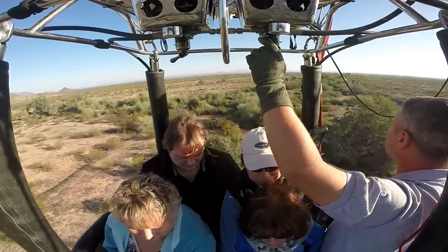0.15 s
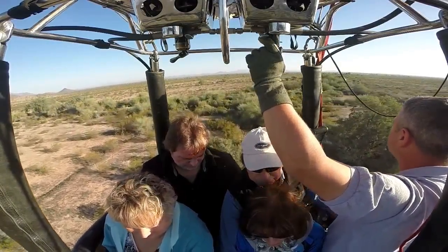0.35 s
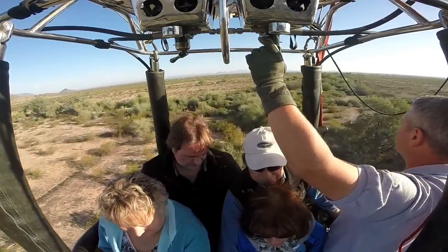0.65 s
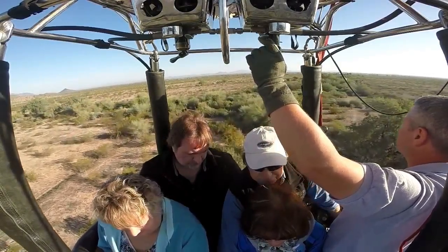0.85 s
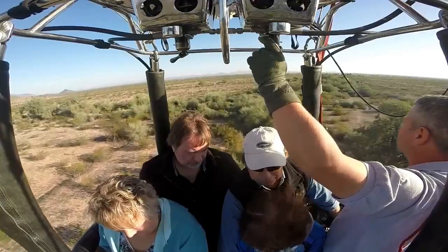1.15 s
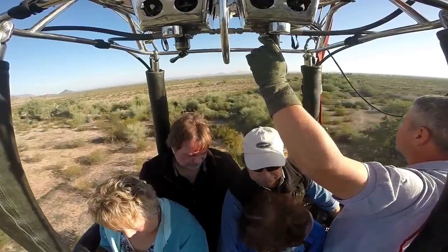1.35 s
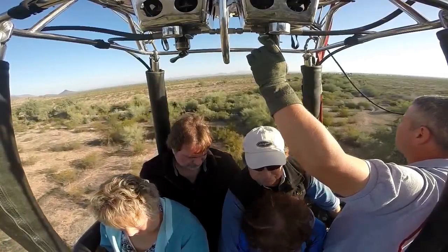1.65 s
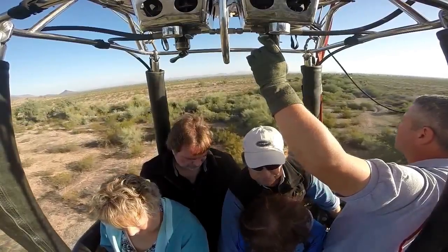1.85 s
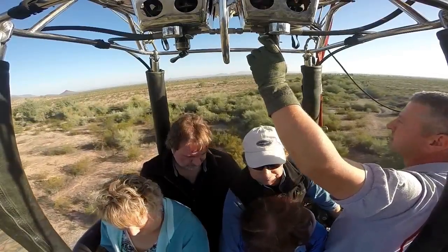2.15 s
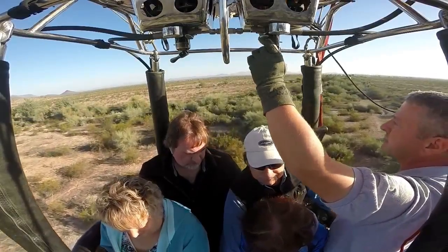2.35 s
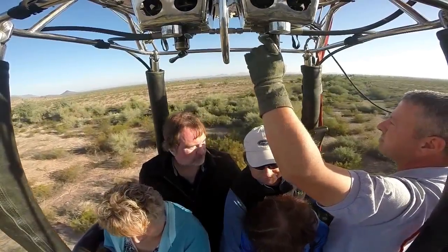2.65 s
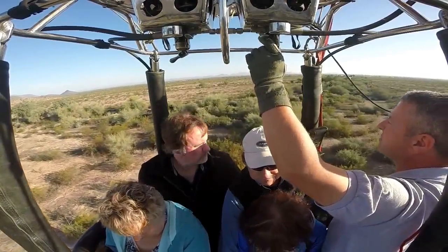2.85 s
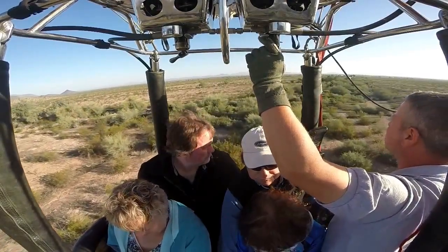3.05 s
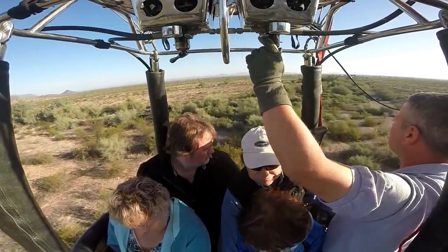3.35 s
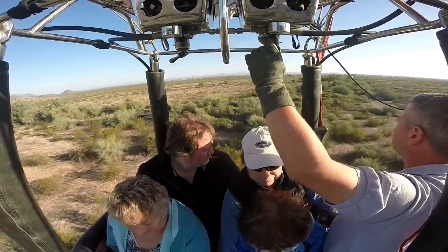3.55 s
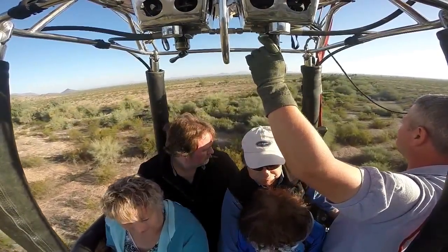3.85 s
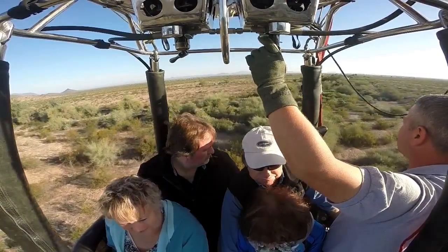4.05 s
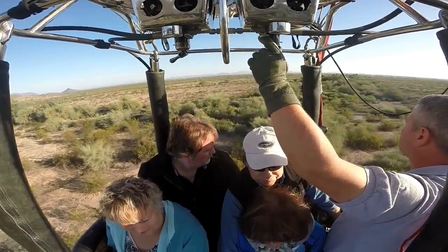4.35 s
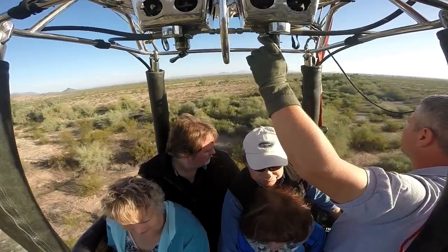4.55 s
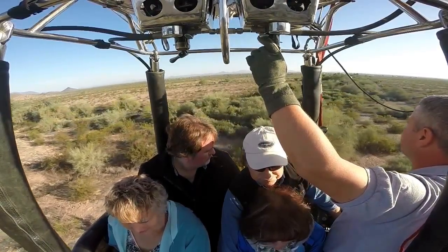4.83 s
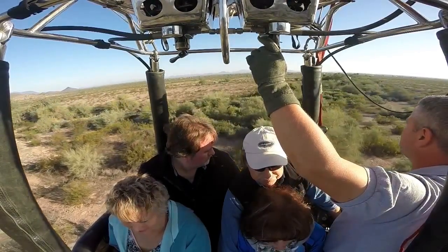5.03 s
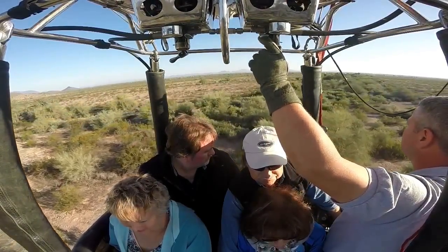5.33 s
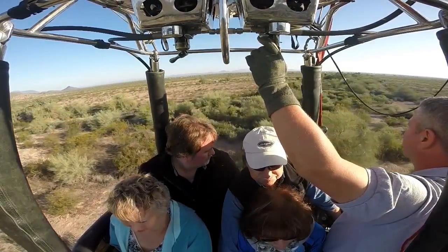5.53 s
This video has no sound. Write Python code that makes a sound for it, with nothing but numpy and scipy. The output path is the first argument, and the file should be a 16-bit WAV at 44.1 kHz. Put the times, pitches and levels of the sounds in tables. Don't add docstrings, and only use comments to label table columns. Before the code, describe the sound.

Close overhead in an open-air balloon basket, a propane burner fires six times in under six seconds. A tiny spit of gas, a deep whump, then a dense mid-low roar with hiss, about half a second to three quarters long. Each blast loses its treble and chokes off, leaving short gaps of softly fluttering pilot flames. The last blast is still burning at the end. Dry, slightly muffled small-camera sound.

```python
import sys
import numpy as np
from scipy import signal
from scipy.fft import rfft, irfft, next_fast_len
from scipy.io import wavfile
from scipy.ndimage import uniform_filter1d, map_coordinates

SR = 44100
rng = np.random.default_rng(int(sys.argv[2]) if len(sys.argv) > 2 else 0)


def bounce(signal):
    frames = np.transpose(np.atleast_2d(signal))
    limited = np.clip(frames, -1, 1)
    pcm = np.round(limited * 32767).astype(np.int16)
    wavfile.write(sys.argv[1], SR, pcm)


def ratio(d):
    e = np.asarray(d, float) / 20
    return 10 ** e


N = 250929

# time in seconds, peak of the push (1 = full scale),
# half width in seconds, share that rebounds, peak of the slow heave (1 = full scale).
IGNITIONS = [
    (0.387, 1.15, 0.00225, 0.11, 0.14),
    (1.228, 0.61, 0.0019, 0.0086, 0.2),
    (2.4964, 0.84, 0.0025, 0.2, 0.11),
    (3.4733, 0.53, 0.0018, -0.12, 0.31),
    (4.379, 0.31, 0.0015, 0.065, .08),
    (5.385, 0.16, 0.0029, .1, 0.11),
]


def unit(x):
    return x / np.sqrt(np.mean(x ** 2) + 1e-20)


def curves(rows):
    s, *cols = np.transpose(rows)
    return [np.interp(np.arange(N) / SR, s, c) for c in cols]


def wobble(rate):
    knots = rng.standard_normal(int(N * rate / SR) + 4)
    return map_coordinates(knots, [np.arange(N) * rate / SR])


def filtered(x, response):
    m = next_fast_len(N + 8192)
    return irfft(rfft(x, m) * response(np.fft.rfftfreq(m, 1 / SR)), m)[:N]


def turbulence(spectrum, patchy_db, flicker):
    z = signal.stft(rng.standard_normal(N), nperseg=512)[2]
    field = uniform_filter1d(rng.standard_normal(z.shape), size=5, axis=0)
    field = uniform_filter1d(field, size=8, axis=1)
    noise = signal.istft(z * ratio(patchy_db * unit(field)), nperseg=512)[1][:N]
    f, db = np.transpose(spectrum)
    colour = lambda hz: ratio(np.interp(np.log(hz + 1), np.log(f + 1), db, -120, -120))
    return unit(filtered(noise * ratio(flicker), colour))


def pilots():
    # frequency in Hz, level in dB per Hz.
    flutter_tone = [(12, -34), (24, 2.5), (102, -1), (351, -6.5), (649, -8), (722, -11), (848, -8.5),
                    (1300, -18), (1660, -30), (2540, -35.5), (3060, -36), (4000, -40), (5380, -43.5),
                    (10200, -58), (12500, -66), (15600, -76), (22000, -120)]
    # time in seconds, flutter level in dB, whistle level in dB.
    pilot_levels = [(0, -35.5, -60), (.3, -37.5, -59.5), (1.1, -41, -70), (2.2, -40, -77),
                    (2.3, -39.5, -74), (2.43, -36.5, -73), (3.4, -42, -71), (5.3, -37.5, -69)]
    # jet resonance in Hz, its width in Hz, level in dB.
    jet_tones = [
        (2120, 170, 0.5),
        (3110, 580, 0),
        (5460, 220, -5),
        (7450, 7400, -12),
    ]
    flutter_db, whistle_db = curves(pilot_levels)
    flutter = turbulence(flutter_tone, patchy_db=.8, flicker=.6 * wobble(12) + 1.2 * wobble(60))
    resonance = lambda f, c, w: 1j * f * w / (c * c - f * f + 1j * f * w)
    jets = lambda f: sum(ratio(db) * resonance(f, c, w) for c, w, db in jet_tones) ** 2
    whistle = unit(filtered(rng.standard_normal(N), jets))
    return ratio(flutter_db) * flutter + ratio(whistle_db + .8 * wobble(13)) * whistle


def valve():
    # time in seconds, level in dB.
    spits = [
        (.359, -49),
        (.364, -37),
        (0.382, -37),
        (1.195, -54),
        (2.462, -50),
        (4.334, -52),
        (5.36, -46),
    ]
    t60 = 0.022
    t = np.arange(N) / SR
    bursts = sum(ratio(db - 60 * np.abs(t - s) / t60) * (t > s) for s, db in spits)
    spit_tone = [(500, -20), (1000, 0), (4000, -4), (9000, -14), (15000, -26)]  # (Hz, dB per Hz)
    return bursts * turbulence(spit_tone, patchy_db=1, flicker=0)


def ignition():
    rebound_delay, heave_quarter = 0.0061, 0.0059
    t, out = np.arange(N) / SR, np.zeros(N)
    push = lambda u: (1 - u * u) * np.exp(-u * u / 2)
    swing = lambda u: -u * np.exp((1 - u * u) / 2)
    for s, peak, width, rebound, heave in IGNITIONS:
        near = slice(round((s - .05) * SR), round((s + .08) * SR))
        u = t[near] - s
        out[near] += peak * (push(u / width) + rebound * push((u - rebound_delay) / width))
        out[near] += heave * swing(u / heave_quarter - 1)
    return out


def flame():
    # valve opens in seconds, opening takes in seconds, valve shuts in seconds,
    # flame dies within in seconds, share of the pressure surge.
    blasts = [
        (0.351, 0.17, 0.94, 0.17, 0.74),
        (1.196, 0.031, 1.939, .17, 1.1),
        (2.455, 0.032, 3.148, 0.21, 0.38),
        (3.442, 0.043, 4.082, 0.26, 0.99),
        (4.326, 0.046, 4.976, 0.23, 1.4),
        (5.35, 0.038, 6.28, .2, 2.2),
    ]
    # time in seconds, gas flow in dB.
    hand = [(.4, 3), (.55, 0), (1.5, -0.46), (1.75, 1.5), (2.02, -0.5), (2.08, -3.5), (2.65, 1), (2.8, 0.9),
            (3.65, 0.1), (3.75, -0.9), (3.98, 1), (4.7, -.5), (5.0, -0.5), (5.135, 3), (5.18, -6),
            (5.42, 1.5), (5.5, -.8), (5.69, 0.5)]
    col = lambda v: np.array(v)[:, None]
    full_db = col([-22, -14.5, -26.5, -33])
    open_power, open_lag = col([0.82, 1.41, 1.46, 1.6]), col([1.3, 1.08, 1.14, 1.28])
    surge_db, surge_s = col([.3, 2.37, 3.4, 2.3]), 0.036
    sag_db, sag_power = col([.3, 1.5, 7, 14]), col([1.2, 1.1, 2.06, 2.36])
    die_db, die_power = col([22, 30, 29.6, 26]), col([2.2, 1.84, 2.3, 2.25])
    flash_db, flash_s = col([-20.5, -22, -46, -64]), 0.0085
    hand_share = col([.3, .6, .9, 1.2])
    gasp_db, gasp_after, gasp_s = 6, 0.0073, 0.011

    t = np.arange(N) / SR
    bump = lambda s, width: np.exp(-((t - s) / width) ** 2 / 2)
    gain = np.zeros((4, N))
    for opens, rise, shuts, dies, share in blasts:
        full = opens + rise
        opening = np.clip((t - opens) / (rise * open_lag), 0, 1) ** open_power
        surge = share * surge_db * np.exp(-np.maximum(t - full, 0) / surge_s)
        sag = sag_db * np.clip((t - full) / (shuts - full), 0, None) ** sag_power
        dying = die_db * np.clip((t - shuts) / dies, 0, None) ** die_power
        gain += opening * ratio(full_db + surge - sag - dying)
    flash = sum(peak * bump(s, flash_s) for s, peak, *_ in IGNITIONS)
    gasp = sum(peak * bump(s + gasp_after, gasp_s) for s, peak, *_ in IGNITIONS)
    return gain * ratio(hand_share * curves(hand)[0] - gasp_db * gasp) + ratio(flash_db) * flash


def burner():
    # frequency in Hz, level in dB per Hz.
    rumble_tone = [(12, -45), (20, -10), (70, 6.5), (167, 7), (200, 5.5), (260, -23), (440, -120)]
    # frequency in Hz, level in dB per Hz.
    roar_tone = [(88, -6), (150, -14.5), (198, -0.5), (232, -3), (274, 1), (384, -4), (483, -1), (696, -8),
                 (800, -4.5), (919, -9), (1090, -8), (1510, -22.5), (1600, -22), (2080, -25), (3520, -120)]
    # frequency in Hz, level in dB per Hz.
    hiss_tone = [(790, -14), (1350, -1.5), (1520, -9.5), (1650, -4.5), (1880, -9), (2170, -4), (2770, -12),
                 (3200, -5.5), (3600, -8), (4060, -11), (4490, -19), (4900, -20.5), (6370, -28),
                 (10800, -120)]
    # frequency in Hz, level in dB per Hz.
    fizz_tone = [(2530, 2.5), (4300, -19), (4660, -16.5), (5520, -1.5), (6110, -6.5), (6690, 1.5),
                 (6980, 0), (7810, -5), (9160, -7), (9920, -11.5), (10600, -9.5), (11700, -14.5),
                 (13400, -13.5), (15400, -21)]
    eddies, shreds = wobble(14), wobble(120)
    rumble = turbulence(rumble_tone, patchy_db=0.0, flicker=2.4 * eddies)
    roar = turbulence(roar_tone, patchy_db=0.5, flicker=0.1 * eddies + 0.8 * shreds)
    hiss = turbulence(hiss_tone, patchy_db=0.63, flicker=0.077 * eddies + 0.81 * shreds)
    fizz_flicker = 1.0 * eddies + 0.45 * shreds + 0.5 * wobble(400)
    fizz = turbulence(fizz_tone, patchy_db=0.3, flicker=fizz_flicker)
    return (flame() * [rumble, roar, hiss, fizz]).sum(axis=0)


def scene():
    return (pilots() + valve() + ignition() + burner())[None]


def top_cut(x):
    return signal.sosfilt(signal.butter(12, 15300, fs=SR, output="sos"), x)


def record(dry):
    clipped = dry / (1 + np.abs(dry / .99) ** 14) ** (1 / 14)
    return top_cut(clipped)


dry = scene()
out = record(dry)
bounce(out)
```